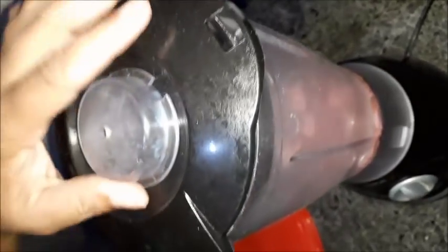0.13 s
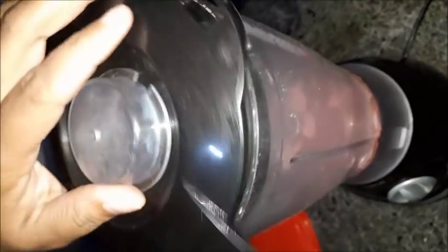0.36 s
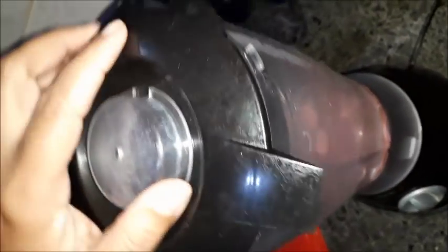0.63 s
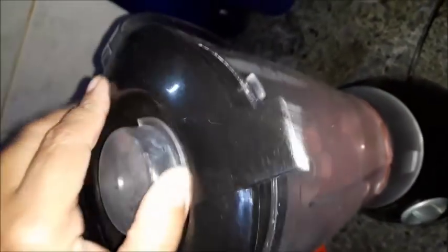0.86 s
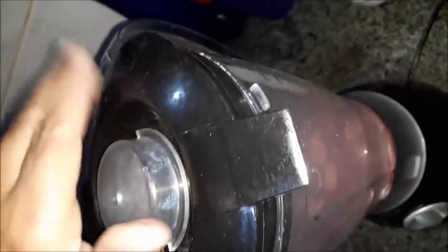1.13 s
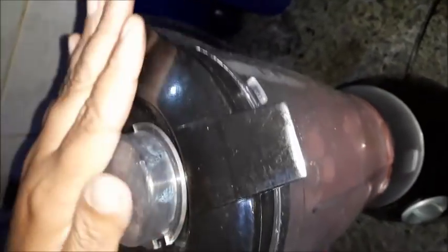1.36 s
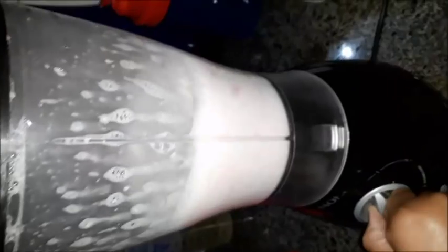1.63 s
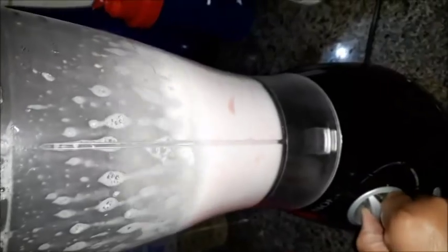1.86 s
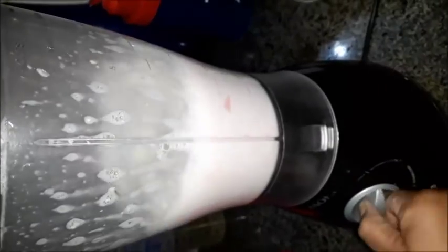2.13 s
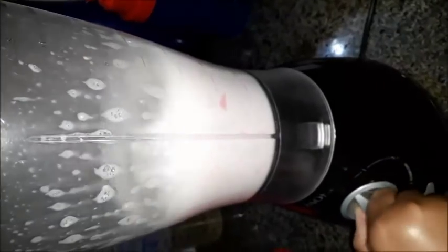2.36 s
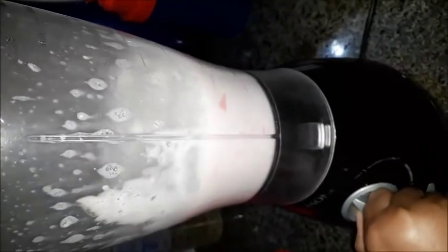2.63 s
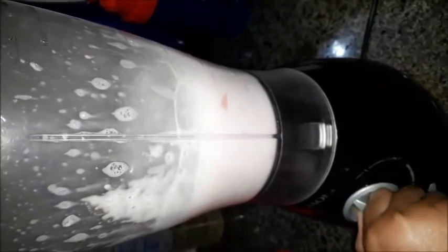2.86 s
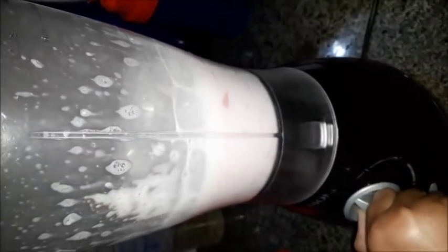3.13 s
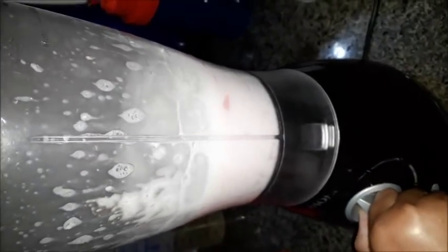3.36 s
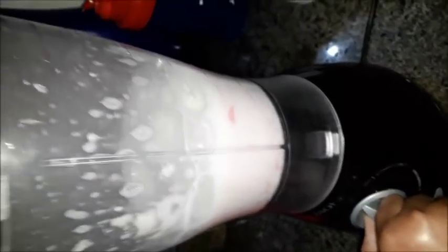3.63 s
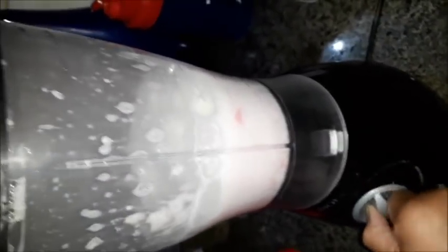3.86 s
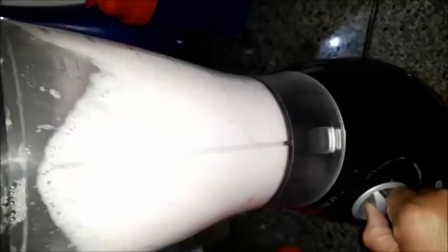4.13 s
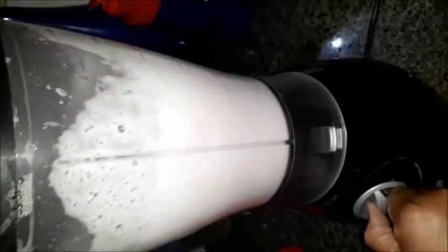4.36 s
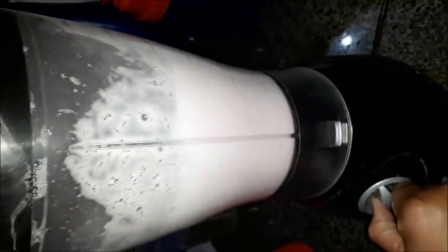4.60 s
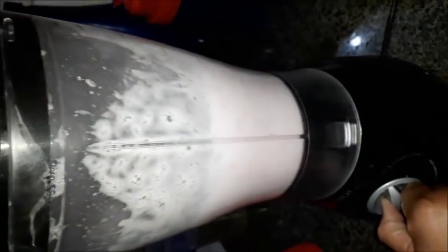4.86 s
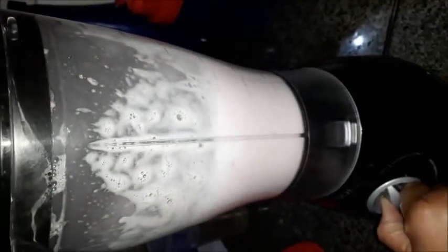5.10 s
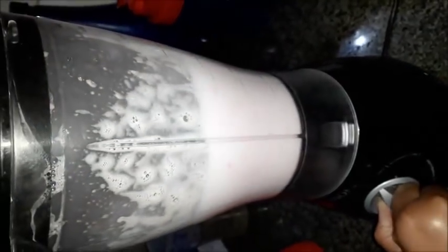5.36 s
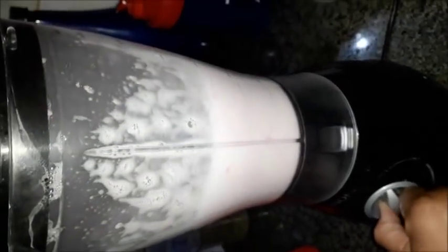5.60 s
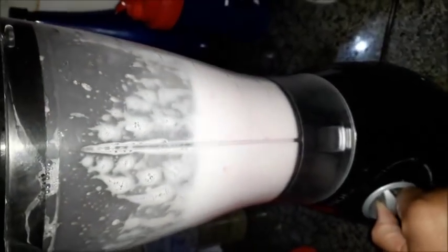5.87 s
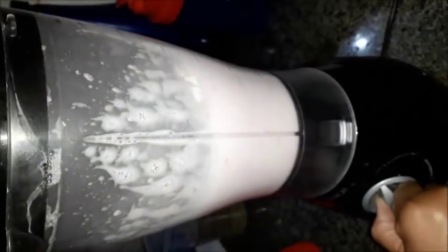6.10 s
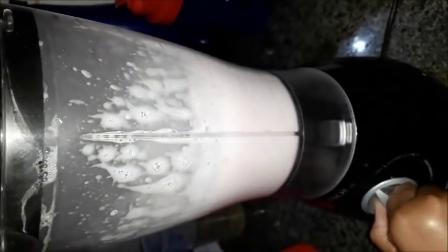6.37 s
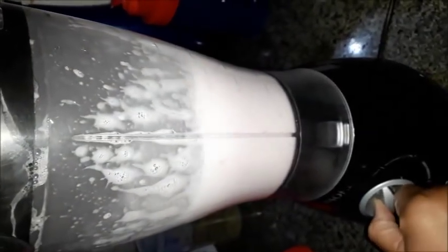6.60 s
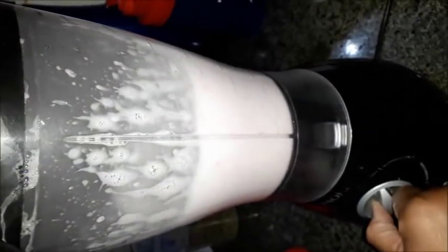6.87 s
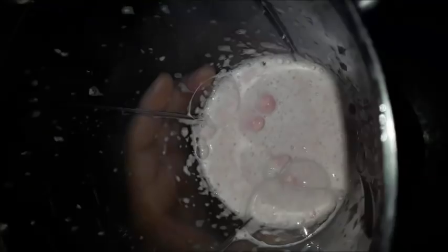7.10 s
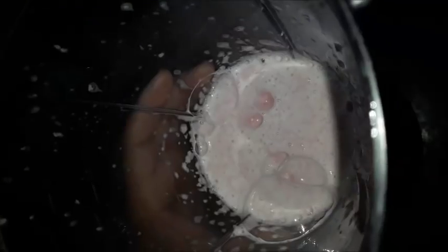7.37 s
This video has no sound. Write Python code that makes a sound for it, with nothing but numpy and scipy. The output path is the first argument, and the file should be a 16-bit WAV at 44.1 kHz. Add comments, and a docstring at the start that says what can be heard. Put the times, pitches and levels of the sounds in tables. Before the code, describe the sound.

Close to a phone microphone in a small hard kitchen, fingers rub and twist a plastic lid with hollow clacks and thuds. An abrupt cut lands mid-run on a blender, dull and lumpy behind its jar, which winds down. After faint taps and a switch click it surges back brighter, sloshing and hissing, in three pulses with short sagging gaps, then cuts to near silence.

```python
"""First heard: a plastic lid twisted onto a blender jar, rubs and taps close to a phone in a hard kitchen.
After abrupt cuts the blender pulses four times on soapy water: a shaft hum that follows the speed, noisy knocks
of soap lumps on the jar wall, and filtered noise for slosh, fan and brushes. The first pulse is heard
from behind the jar (dull), the later ones from nearer the motor vents (bright)."""
import sys
import numpy as np
from scipy import signal
from scipy.fft import rfft, irfft
from scipy.io import wavfile
from scipy.ndimage import uniform_filter1d

SR = 44100
rng = np.random.default_rng(int(sys.argv[2]) if len(sys.argv) > 2 else 0)


def pcm_store(signal):
    """Save signal as 16-bit PCM."""
    levels = np.round(np.clip(np.atleast_2d(signal), -1, 1) * 32767)
    wavfile.write(sys.argv[1], SR, levels.astype(np.int16).T)


def ratio_of_db(decibels):
    """Turn decibels (scalar or array-like) into linear amplitude factors; 0 dB maps to 1."""
    return 10 ** (np.asarray(decibels, float) / 20)


N = 329868
T = np.arange(N) / SR


def level(x, db):
    """Scale to an rms level."""
    return x * ratio_of_db(db) / np.sqrt(np.mean(x ** 2))


def decay(t, t60):
    """Exponential fade that loses 60 dB in t60 seconds."""
    return np.exp(-np.log(1000) * t / t60)


def curve(rows):
    """Columns of a table, sample by sample, with a gate that is open while the table lasts."""
    s, *columns = np.transpose(rows)
    gate = uniform_filter1d(1. * ((T > s[0]) & (T < s[-1])), size=64)
    return [np.interp(T, s, c) for c in columns] + [gate]


def colour(x, points, rings=()):
    """Causal minimum-phase filter whose gain follows (f/Hz, level/dB) points, lifted at resonances."""
    size = 4096
    hz = np.maximum(np.fft.rfftfreq(size, 1 / SR), 1)
    points_hz, points_db = np.transpose(points)
    db = np.interp(np.log(hz), np.log(points_hz), points_db)
    for centre_hz, width_hz, lift_db in rings:
        db = db + lift_db / (1 + (2 * (hz - centre_hz) / width_hz) ** 2)
    # folding the cepstrum onto positive times makes the filter causal
    cepstrum = irfft(np.log(ratio_of_db(db)))
    folded = np.r_[cepstrum[0], 2 * cepstrum[1:size // 2], np.zeros(size // 2)]
    impulse = irfft(np.exp(rfft(folded)))
    return signal.oaconvolve(x, impulse)[:len(x)]


def walk(rate):
    """Random levels drawn rate times a second, joined by straight slopes; spread near 1."""
    k = int(SR / rate)
    held = np.repeat(rng.standard_normal(N // 40 + 1), k)[:N]
    return uniform_filter1d(held, k)


def burst(t60, rise, size=8192):
    """A puff of noise that swells for a moment and fades."""
    t = np.arange(size) / SR
    return rng.standard_normal(size) * (1 - np.exp(-t / rise)) * decay(t, t60)


def knocking(rate, spread_db, t60, rise=.0015):
    """Random small blows, many weak and few strong, each a short scrape."""
    chance = rng.random((2, N))
    strength = ratio_of_db(spread_db * np.minimum(-np.log(1 - chance[1]), 2))
    blows = (chance[0] < rate / SR) * strength
    envelope = signal.lfilter([1], [1, -decay(1 / SR, t60)], blows)
    envelope = signal.lfilter([1], [1, -np.exp(-1 / (rise * SR))], envelope)
    return level(envelope * rng.standard_normal(N), 0)


# place: quiet kitchen air: f/Hz, relative level/dB per Hz
HUSH = [(18, -36), (30, -8.5), (112, 3.5), (259, -16.5), (1190, -13.5), (1430, -17), (1590, -16.5),
        (1960, -18.5), (3310, -25.5), (16000, -30)]


def kitchen_air():
    """Steady soft noise, mostly low, under everything."""
    return level(colour(rng.standard_normal(N), HUSH), -75)


# place: fading time of the hard kitchen: f/Hz, t60/s
ROOM = [(200, 0.53), (1500, 0.59), (5000, 0.36), (12000, 0.35)]


def kitchen():
    """Diffuse kitchen tail: octave bands of noise, each fading at its own rate."""
    t = np.arange(SR) / SR
    room_hz, room_t60 = np.transpose(ROOM)
    tail = 0
    for hz in 125 * 2. ** np.arange(8):
        t60 = np.interp(np.log(hz), np.log(room_hz), room_t60)
        edges = [hz / np.sqrt(2), min(hz * np.sqrt(2), .45 * SR)]
        band = signal.butter(2, edges, "bandpass", fs=SR, output="sos")
        tail = tail + signal.sosfilt(band, rng.standard_normal(SR)) * decay(t, t60)
    tail = tail * np.minimum(t / 0.0047, 1)  # builds up over 4.7 ms
    return tail / np.sqrt(np.sum(tail ** 2))


# faint narrow whistles in the pauses: start t/s, end t/s, f/Hz, width f/Hz, level/dB
WHISTLES = [(3.3, 3.559, 1060, 119, -77), (3.451, 3.93, 5610, 150, -85), (7.4, 7.48, 1380, 80, -75)]


def whistles():
    """Thin bands of noise that come and go softly."""
    out = 0
    for start, end, hz, width_hz, db in WHISTLES:
        edges = [hz - width_hz / 2, hz + width_hz / 2]
        band = signal.butter(1, edges, "bandpass", fs=SR, output="sos")
        gate = uniform_filter1d(1. * ((T > start) & (T < end)), size=1024)
        out = out + gate * level(signal.sosfilt(band, rng.standard_normal(N)), db)
    return out


# tiny dry ticks of plastic: t/s, relative level/dB, loudest f/Hz
TICKS = [(0.013, -49.5, 9000), (0.068, -57, 6500), (0.132, -60, 11000), (3.2834, -69.5, 2100),
         (3.4554, -58.5, 10000), (3.4785, -63, 2000), (3.7484, -49.5, 2500), (3.8474, -55.5, 9000),
         (5.56, -41.5, 12000), (6.4, -33, 14000), (6.525, -27.5, 13000)]
# their common colour: f/Hz, relative level/dB per Hz
TICK_COLOUR = [(800, -22), (2200, -5), (6000, 2.5), (12000, 5.5), (16000, -15.5)]


def ticks():
    """Very short puffs of mostly treble noise, without echo."""
    size = 2048
    out = np.zeros(N + size)
    for s, db, hz in TICKS:
        puff = burst(.012, .0003, size)
        at = int(s * SR)
        out[at:at + size] += ratio_of_db(db) * colour(puff, TICK_COLOUR, [(hz, .5 * hz, 10.)])
    return out[:N]


# close by: fingers rubbing on the lid and at the switch, one list for each spell:
# t/s, then relative level/dB of low, middle and treble
RUB = [
    [(0.0, -59, -71, -66), (0.12, -59.5, -73.5, -71), (0.28, -59, -84.5, -79), (0.49, -50, -51.5, -52.5),
     (0.58, -52, -54.5, -61.5), (0.68, -56.5, -64, -71.5), (0.83, -52, -52, -58.5),
     (0.97, -44.5, -44.5, -57.5), (1.23, -73, -81.5, -73), (1.37, -63, -48, -70.5), (1.48, -71, -69, -73)],
    [(3.44, -78, -91.5, -88), (3.84, -82, -85.5, -76), (3.935, -68, -56, -60)],
    [(7.18, -79, -90, -91), (7.32, -77.5, -86.5, -80.5), (7.48, -82, -90.5, -92)],
]


def rubbing():
    """Skin sliding on plastic: a low grainy rustle, a dry middle and a thin treble."""
    grain = knocking(280.0, 1.5, 0.072)
    hiss = rng.standard_normal(N)
    # colours: (f/Hz, relative level/dB per Hz)
    low_colour = [(80, -35.0), (170, 4), (300, 2), (700, -3.5), (1200, -11), (2500, -36.5)]
    middle_colour = [(500, -18.0), (1100, -6), (2000, -11.5), (3500, -12.5), (6000, -24.5)]
    high_colour = [(2500, -30), (5000, 9.5), (12000, 2.5), (16000, -10.0)]
    low = level(colour(grain, low_colour), -1.9)
    middle = level(colour(grain, middle_colour), 0.54)
    high = level(colour(hiss, high_colour), -2.3)
    out = 0
    for rows in RUB:
        low_db, middle_db, high_db, gate = curve(rows)
        out = out + gate * (ratio_of_db(low_db) * low + ratio_of_db(middle_db) * middle + ratio_of_db(high_db) * high)
    return out


def ring(modes, place_hz, reach, chance):
    """Damped modes; where the blow lands decides which sound loudest (reach in octaves)."""
    t = np.arange(16384) / SR
    scatter_db, detune = 2, .008
    out = 0
    for (hz, db, t60), (level_chance, pitch_chance) in zip(modes, chance):
        near_db = -10 * np.log10(1 + (np.log2(hz / place_hz) / reach) ** 2)
        gain = ratio_of_db(db + near_db + scatter_db * level_chance)
        out = out + gain * decay(t, t60) * np.sin(2 * np.pi * hz * (1 + detune * pitch_chance) * t)
    return out / np.sqrt(np.mean(out[:900] ** 2))


# close by: lid, jar and switch under the hand: t/s, relative level/dB of clack, thud and snap,
# loudest thud f/Hz, loudest clack f/Hz
TAPS = [(0.0024, -46.5, -40, -72.5, 308, 1220), (0.1444, -54, -43, -65.5, 320, 700),
        (0.1884, -54, -50, -72, 250, 700), (0.209, -57, -48, -75, 275, 700),
        (0.251, -54, -47, -66, 275, 700), (0.279, -45, -35, -61, 300, 900),
        (0.2888, -18, -18.5, -30, 390, 2850), (0.4359, -23, -20.5, -48.5, 258, 1110),
        (0.5131, -4.5, -18, -26.5, 264, 1080), (0.6476, -35, -32, -56, 262, 1110),
        (0.841, -30.5, -21.5, -41.5, 434, 1110), (0.8729, -26, -30, -35.5, 161, 2250),
        (0.8906, -12, -11, -16.5, 272, 1500), (0.8983, -9, -21, -17.5, 178, 1570),
        (1.151, -53, -41, -65.5, 310, 1540), (1.2667, -69, -46, -73, 180, 2440),
        (1.3115, -22.5, -23.5, -49.5, 193, 1790), (1.3768, -30, -39, -42.5, 171, 2500),
        (2.6094, -29.5, -24, -56, 279, 2010), (2.6335, -23.5, -25, -58.5, 290, 1082),
        (2.689, -33, -36, -63, 250, 966), (2.7327, -37, -32.5, -69, 304, 956),
        (3.4043, -44, -40, -61.5, 500, 950), (3.4126, -22.5, -20, -36, 200, 800),
        (3.4218, -27, -41, -26, 130, 959), (3.752, -66, -60.5, -66, 170, 2490),
        (3.9398, -8.5, -34, -14.5, 246, 1640), (3.965, -23.5, -11.5, -39, 236, 1005),
        (6.54, -8, -30, -32, 266, 990), (7.427, -55, -52.5, -76, 130, 1070)]
# low modes of lid and jar: f/Hz, relative level/dB, t60/s
THUD_MODES = [(130, -17, 0.056), (164.4, -8, 0.087), (204, -7.5, 0.063), (255, 1.5, 0.043),
              (316.7, 3, 0.068), (378, 4.5, 0.029), (488, -1.5, 0.074), (578, 13, 0.021), (670, -11, 0.13)]
# higher modes of the plastic wall: f/Hz, relative level/dB, t60/s
WALL_MODES = [(1107, 0, .045), (1400, -4, .02), (1720, -3, .02), (2150, -4, .02), (2720, -4, .02),
              (2950, 0, .03)]
# broad part of a tap: f/Hz, relative level/dB per Hz
CLACK_COLOUR = [(150, -23.5), (350, -2.5), (800, -4.5), (2000, 0.5), (3500, -5), (6000, -15.5),
                (10000, -70.5)]
# treble of a tap: f/Hz, relative level/dB per Hz
SNAP_COLOUR = [(2000, -22.5), (4500, 1.5), (8000, -9), (12000, -4), (16000, -21.5)]


def taps(start, end):
    """Taps from start to end: a low thud, a clack with the plastic wall's faint ring, a snap of treble."""
    size = 16384
    t = np.arange(size) / SR
    out = np.zeros(N + size)
    for s, clack_db, thud_db, snap_db, thud_hz, clack_hz in TAPS:
        if not start <= s < end:
            continue
        chance = rng.standard_normal((2, 9, 2))
        puff = burst(0.027, rise=0.0012, size=size)
        # the soft lid pushes for a few milliseconds
        thud = ring(THUD_MODES, thud_hz, .26, chance[0]) * (1 - np.exp(-t / 0.0028))
        faint = ratio_of_db(-5) * ring(WALL_MODES, clack_hz, .17, chance[1])
        clack = faint + ratio_of_db(22.0) * colour(puff, CLACK_COLOUR, [(clack_hz, 500, 5.0)])
        snap = colour(puff, SNAP_COLOUR)
        blow = ratio_of_db(thud_db - 0.5) * thud + ratio_of_db(clack_db - 19.5) * clack + ratio_of_db(snap_db + 9.5) * snap
        at = int(s * SR)
        out[at:at + size] += blow
    return out[:N]


# the switch: on t/s, off t/s, full speed f/Hz (turns per second),
# hum level/dB at nominal speed before shake and jolt
PULSES = [(1.0, 2.325, 247, -29), (3.949, 5.236, 258.4, -23.5), (5.554, 6.238, 259.3, -23.5),
          (6.526, 7.3, 256.4, -23.5)]
# thick foam slows the blades for a moment, an air pocket lets them race: t/s, change f/Hz, half length t/s
SAGS = [(4.219, 14, .05), (4.344, -22, .07), (4.593, -17, .07), (6.793, -4.5, 0.083)]


def speed():
    """Turns per second: rising when switched on, coasting down when off; also the jolt and hum level."""
    spin_up_s, spin_up_shape, coast_hz_per_s, still_hz = .1, 1.3, 620, 4.
    surge_s = 0.058  # the jolt after switching on dies away
    hz, surge, hum_db = np.zeros(N), np.zeros(N), np.zeros(N)
    left_hz = 0  # speed left over from the pulse before
    next_on = [pulse[0] for pulse in PULSES[1:]] + [T[-1] + 1]
    for (on, off, top_hz, db), later in zip(PULSES, next_on):
        powered_s = np.clip(T, on, off) - on
        up = top_hz - (top_hz - left_hz) * np.exp(-(powered_s / spin_up_s) ** spin_up_shape)
        run = np.maximum(up - coast_hz_per_s * np.maximum(T - off, 0), 0)
        now = (T >= on) & (T < later)
        hz[now] = run[now]
        hum_db[now] = db
        left_hz = run[now][-1]
        surge[now] = np.exp(-(T[now] - on) / surge_s)
    for s, change_hz, half in SAGS:
        hz = hz + change_hz * np.exp(-((T - s) / half) ** 2)
    return np.maximum(hz, still_hz), uniform_filter1d(surge, size=512), hum_db


NOMINAL_HZ = 250  # turns per second


def follow(law, hz, load_db, surge):
    """Level change in dB; law: (dB per octave of speed, share of the load curve, lift in dB at the jolt)."""
    per_octave, share, jolt_db = law
    return per_octave * np.log2(hz / NOMINAL_HZ) + share * load_db + jolt_db * surge


# two spells of blending, first from behind the jar, then nearer the vents: t/s, relative level/dB of
# the liquid the blades throw up, of the shaking base, of the hiss
LOAD = [
    [(1.513, 0.5, 2, 1), (1.6, 3.5, 1, 3), (1.78, -1, 1, 0), (1.9, 0.5, -0.5, 0), (2.1, -0.5, 1, 0.5),
     (2.4, 0.5, -0.5, -0.5), (2.6, -0.5, 9.5, -2.5), (2.75, -2, -13, -16), (3.0, -18, 0, -10)],
    [(3.94, 15, 4, 6), (4.0, 7, 5.5, 5), (4.15, 0, 9, -2.5), (4.24, 6.5, 4.5, 6.5), (4.42, 4, 5.5, 3),
     (4.59, 3, 0, 3), (4.68, -0.5, 0.5, -0.5), (4.8, 0.5, 0.5, 1), (5.2, 0.5, 0, 2), (5.42, 1, -2.5, 1),
     (5.53, -3.5, 6, 0), (5.61, -2.5, -4.5, -1), (5.7, -3, 0, -1.5), (5.9, -2, -0.5, -0.5),
     (6.25, 0, -2, -0.5), (6.4, 0.5, -2, 1), (6.5, 1, -1.5, -0.5), (6.65, -2.5, -0.5, -0.5),
     (6.85, 0, 2, -0.5), (7.112, 0, -1, 0)],
]


def shaft(hz, surge, full_db):
    """The unbalanced rotor shakes the base once a turn; returns the hum and the angle."""
    waver_db = 2.2
    angle = 2 * np.pi * np.cumsum(hz * (1 + .01 * walk(45))) / SR
    # the second harmonic is 15 dB down at nominal speed and weakens as the speed rises
    second_db = -15 - 18 * np.log2(hz / NOMINAL_HZ) + 2 * waver_db * walk(40)
    first = ratio_of_db(waver_db * walk(50)) * np.sin(angle)
    wave = first + ratio_of_db(second_db) * np.sin(2 * angle)
    hum = 0
    for rows in LOAD:
        _, shake_db, _, gate = curve(rows)
        hum = hum + gate * ratio_of_db(full_db + follow((18, 0.98, 12), hz, shake_db, surge))
    # the base passes little hum below 141 turns per second
    hum = hum / (1 + (141 / hz) ** 8)
    return np.sqrt(2) * hum * wave, angle


# the loudest lumps against the wall: t/s, relative level/dB, loudest f/Hz
LUMPS = [(1.5226, 3.5, 1810), (1.5732, -1.5, 1836), (1.6177, 1, 2030), (1.7054, 2.5, 1930),
         (1.7326, -0.5, 1934), (1.8214, -5.5, 2013), (1.8596, -1.5, 1927), (1.9033, 3, 1880),
         (1.9591, 4.5, 1910), (2.1235, 0, 1290), (2.0424, -7.5, 1954), (2.1528, -1.5, 2070),
         (2.2357, 2, 1900), (2.2713, -5.5, 1830), (2.3261, -7.5, 1880), (2.424, -3.5, 1880),
         (2.519, -7, 1333), (2.601, -6.5, 1930), (4.0396, 2.5, 1974), (4.075, -1.5, 1630),
         (4.2783, 2.5, 2055), (4.9, -3, 1613), (5.0826, -4, 1270), (5.1706, 2, 1260), (5.2345, 0.5, 1298),
         (5.3255, -4.5, 1560), (5.3571, -7, 1274), (5.405, -4.5, 1303), (5.7509, -5, 1362),
         (5.8237, -2, 1583), (6.0031, 0.5, 1230), (6.1767, -1.5, 1293), (6.3467, -4.5, 1530),
         (6.575, 0, 1540), (6.73, -2.5, 1397)]
# resonances of jar and housing: f/Hz, width f/Hz, lift level/dB
RINGS = [(977, 84, 6), (1270, 70, 3.5), (1570, 98, 2), (1880, 140, 2), (2010, 39, 1), (2884, 90, 6),
         (5160, 510, 6), (6244, 900, 4.5), (7010, 360, 2), (11320, 1000, 6.5)]


def lumps(jar):
    """Each big lump hits the wall at its own spot, which colours the knock."""
    size = 8192
    out = np.zeros(N + size)
    unit = np.sqrt(np.mean(colour(rng.standard_normal(SR), jar, RINGS) ** 2))
    for s, db, spot_hz in LUMPS:
        puff = burst(t60=.04, rise=.001, size=size)
        knock = colour(puff, jar, RINGS + [(spot_hz, 220, 9.0)])
        at = int(s * SR)
        out[at:at + size] += ratio_of_db(db) * knock
    return out[:N] / unit


# jar wall, one list for each blending spell: f/Hz, relative level/dB per Hz
JAR = [
    [(320, -54), (550, -22), (803, -23), (966, -10), (1060, -8), (1450, -2.5), (1680, -6), (1920, -1),
     (2290, -8), (3880, -28.5), (4500, -32.5), (5850, -57.5), (9900, -120)],
    [(320, -40.5), (550, -23.5), (775, -14.5), (892, -13.5), (974, -6), (1270, -1), (2020, -3.5),
     (2370, -8), (2850, -7.5), (3710, -15.5), (4500, -13), (5850, -36.5), (9900, -120)],
]
# deep slosh, the same in both: f/Hz, relative level/dB per Hz
SLOSH = [(24, -49.5), (40, -43.5), (64, -27.5), (135, -16.5), (253, 4.5), (350, -1.5), (509, 1.5),
         (655, -13), (800, -1.5), (1040, -49), (1760, -120)]
# motor vents, one list for each blending spell: f/Hz, relative level/dB per Hz
VENTS = [
    [(1940, -22.5), (3300, 3.5), (3910, -9), (4350, -0.5), (5430, -8.5), (6210, -4), (8140, -2),
     (10200, -24.5), (11300, -22.5), (12800, -28), (15200, -25.5), (16200, -28.5), (16500, -75.5)],
    [(1940, -37), (3300, -4), (3730, -7.5), (4090, -6), (5690, -3), (6260, 0.5), (7450, -6.5),
     (9500, -14.5), (10900, -8), (11500, -7.5), (15600, -16.5), (16200, -39), (16500, -62)],
]
# at nominal speed, one row for each blending spell: relative level/dB of churning in the jar,
# of slosh, of motor hiss
LAYER_DB = [(-16.5, -37, -32), (-18.5, -33, -20.5)]


def blending(angle, hz, surge):
    """Water and soap thrown round the jar, and the hiss of fan and brushes that beats with the shaft."""
    churn_law, slosh_law, hiss_law = (5.8, 1.21, 9), (3.65, 1, 12), (11.9, 0.92, 8)
    lump_db = -9.0
    out = 0
    for rows, layer_db, jar, vents, foam_db in zip(LOAD, LAYER_DB, JAR, VENTS, (-3.0, 2.0)):
        load_db, _, air_db, gate = curve(rows)
        churn_db = layer_db[0] + follow(churn_law, hz, load_db, surge)
        slosh_db = layer_db[1] + follow(slosh_law, hz, load_db, surge)
        hiss_db = layer_db[2] + follow(hiss_law, hz, air_db, surge)
        knocks = knocking(260., 1.3, 0.013)
        # foam fills the gaps between the knocks
        foam = ratio_of_db(foam_db + 2.2 * walk(25)) * rng.standard_normal(N)
        wall = level(colour(knocks + foam, jar, RINGS), -1.79)
        slosh = level(colour(knocks + ratio_of_db(2.5) * foam, SLOSH), 3.07)
        air = (1 + 0.074 * np.sin(angle)) * ratio_of_db(0.29 * walk(16)) * rng.standard_normal(N)
        hiss = level(colour(air + ratio_of_db(-3.0) * knocks, vents, RINGS), -0.58)
        layers = ratio_of_db(churn_db) * wall + ratio_of_db(slosh_db) * slosh + ratio_of_db(hiss_db) * hiss
        out = out + gate * (layers + ratio_of_db(lump_db) * lumps(jar))
    return out


# the stretches heard between the cuts: start t/s, end t/s
STRETCHES = [(0, 1.481), (1.513, 3.437), (3.44, 7.112), (7.18, 7.48)]


def scene():
    """Every stretch carries only its own taps and echo; the cuts are abrupt."""
    hz, surge, full_db = speed()
    hum, angle = shaft(hz, surge, full_db)
    machine = blending(angle, hz, surge)
    # the hum is kept dry, without echo, so its level stays steady
    near = hum + machine + rubbing() + whistles() + ticks() + kitchen_air()
    tail = kitchen()
    out = 0
    for start, end in STRETCHES:
        kept = uniform_filter1d(1. * ((T >= start) & (T < end)), size=32)
        hand = taps(start, end)
        far = kept * (ratio_of_db(-10.0) * machine + ratio_of_db(-7.5) * hand)
        echo = signal.oaconvolve(far, tail)[:N]
        out = out + kept * (near + hand + echo)
    return out[None]


def band_limit(x):
    """A steep low-pass at the top of the band."""
    return signal.sosfilt(signal.butter(12, 16840, fs=SR, output="sos"), x)


def record(dry):
    """The phone's microphone loses the deep bass and the phone rounds the loudest peaks."""
    low_cut = signal.butter(3, 106, "highpass", fs=SR, output="sos")
    thin = signal.sosfilt(low_cut, dry)
    mix = np.tanh(0.61 * thin) / .6
    return band_limit(mix)


dry = scene()
out = record(dry)
pcm_store(out)
```